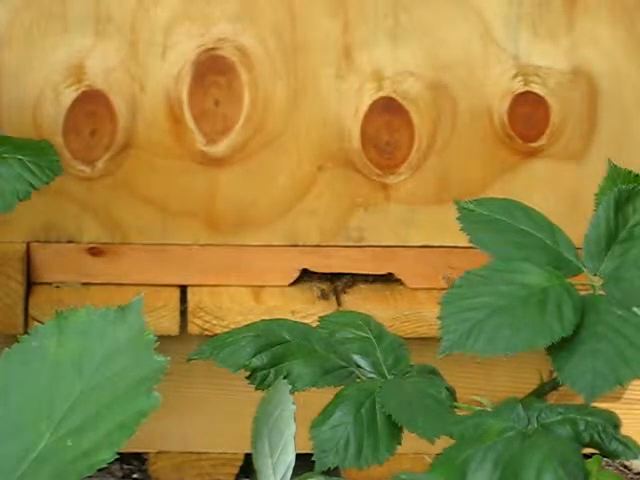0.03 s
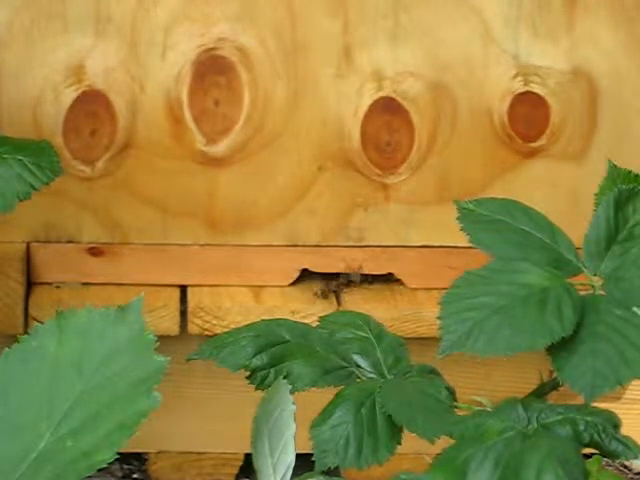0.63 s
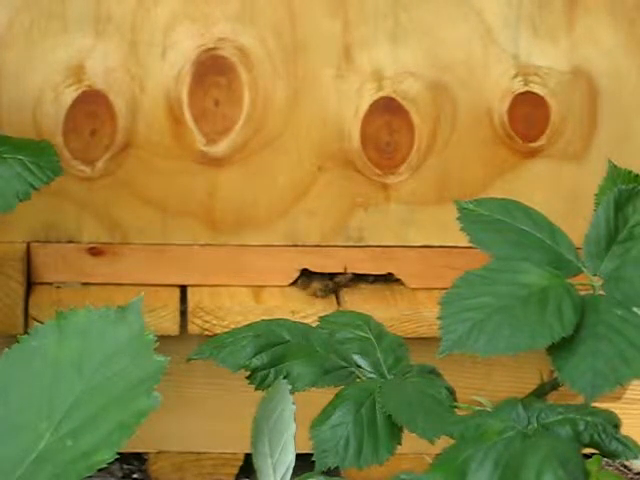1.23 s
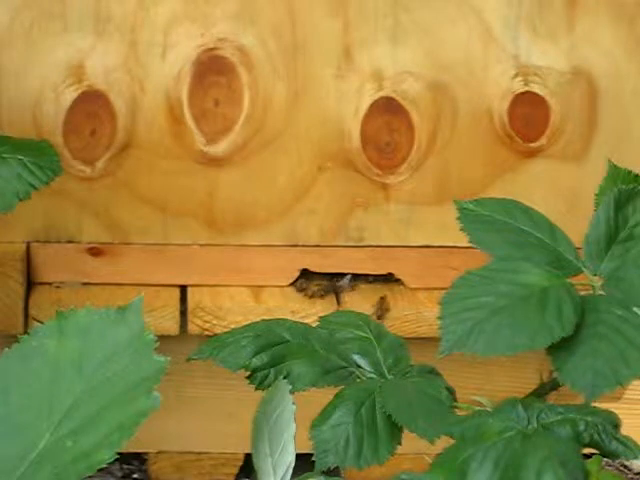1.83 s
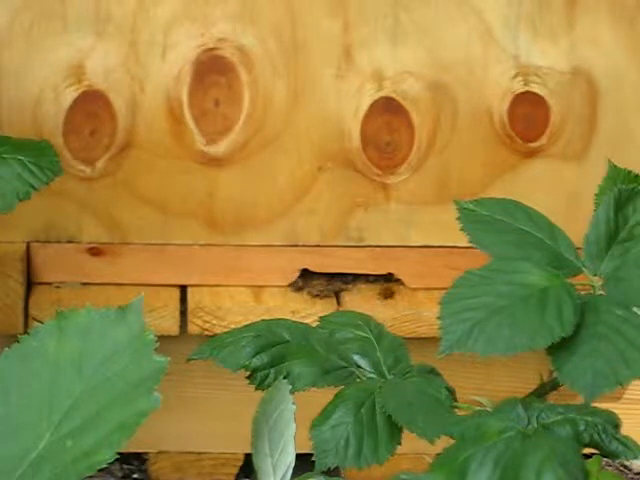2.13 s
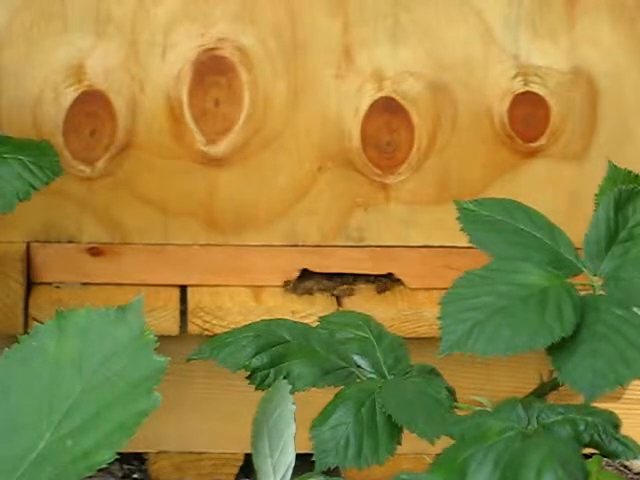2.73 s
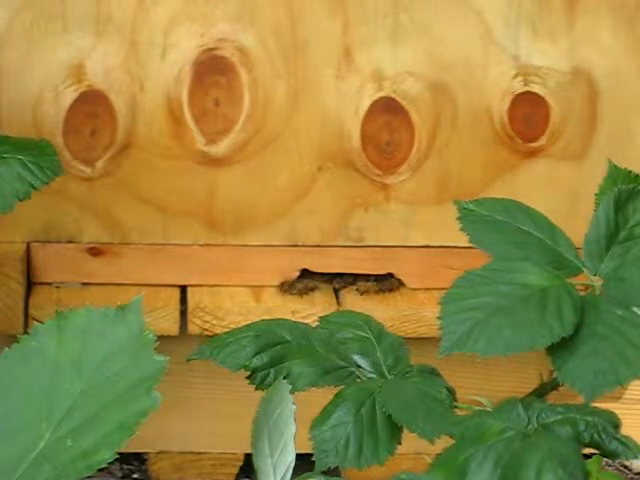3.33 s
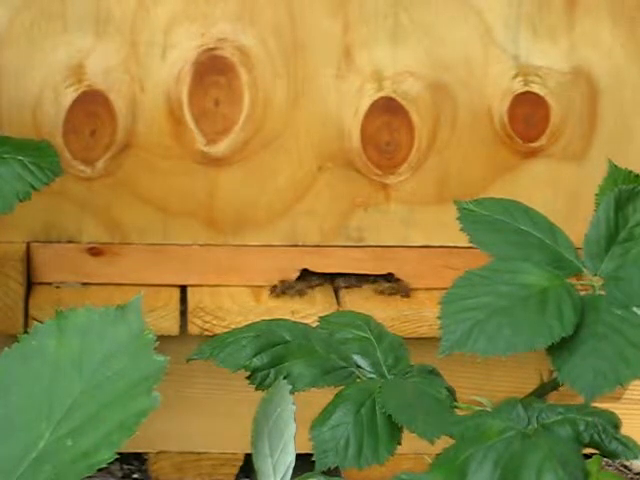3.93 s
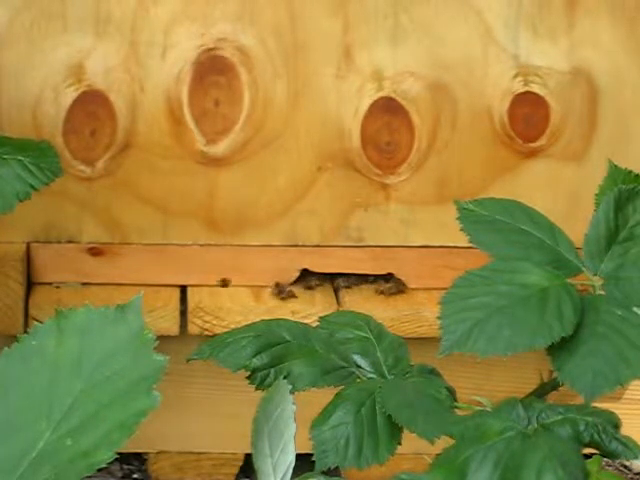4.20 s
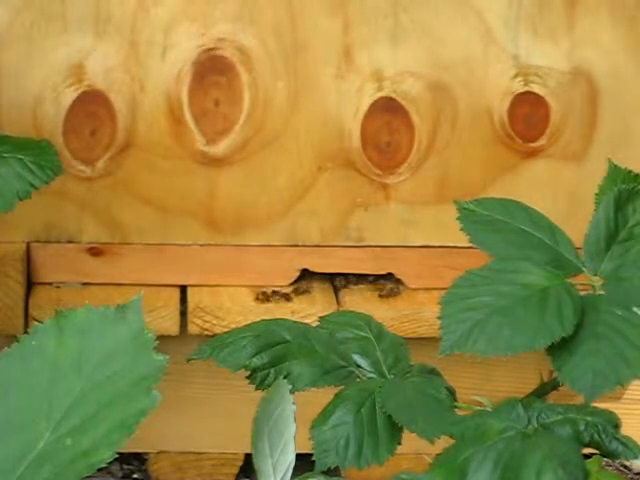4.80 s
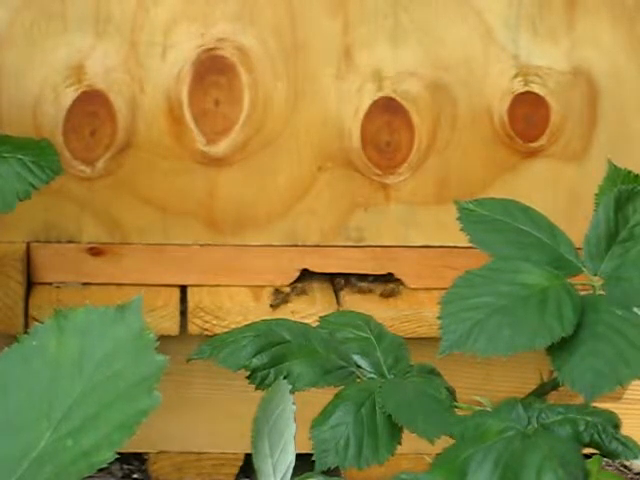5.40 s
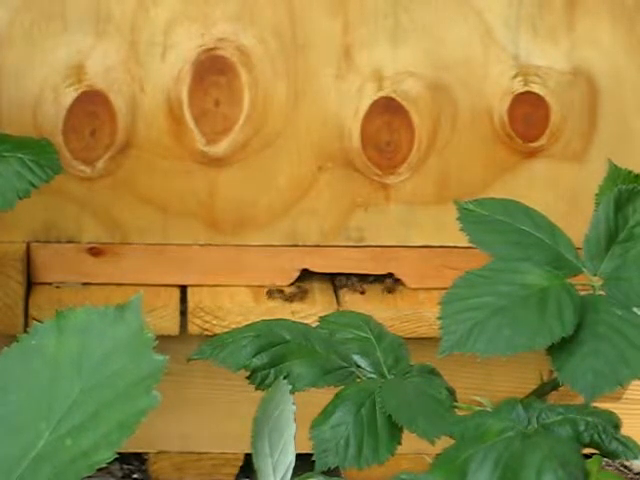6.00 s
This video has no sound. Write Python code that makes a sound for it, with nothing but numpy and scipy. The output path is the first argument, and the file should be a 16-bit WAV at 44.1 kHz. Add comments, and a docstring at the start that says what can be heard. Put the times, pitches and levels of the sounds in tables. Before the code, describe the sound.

In a quiet garden, a single bee buzzes softly by with a light rush of air and leaves, above the faint, steady hum of a hive. A far-off motor drones and a thin electronic whine lies underneath. After a couple of tiny ticks, a sudden cluster of loud, close plastic clicks comes from handling the camera, trailing off into weaker ticks and fingers rubbing near the microphone.

```python
"""Throughout: outdoor air, a low far-off motor drone, the thin whine of a camera's electronics
and the faint wingbeat hum of honeybees at the entrance of a wooden garden hive.
In the first second one bee flies by with a soft, grainy rush of air, and leaves stir.
From 3 s the camera's plastic case ticks; near 3.8 s a hand shifts on it: a quick run of loud clicks.
Small ticks and finger rubs follow."""
import sys
import numpy as np
from scipy import signal
from scipy.fft import rfft, irfft
from scipy.io import wavfile
from scipy.ndimage import uniform_filter1d

SR = 44100
rng = np.random.default_rng(int(sys.argv[2]) if len(sys.argv) > 2 else 0)


def waveform_to_disk(signal):
    """Save audio, clipped to [-1, 1], as 16-bit WAV at the path in sys.argv[1]."""
    frames = np.transpose(np.atleast_2d(signal))
    scaled = np.clip(frames, -1, 1) * 32767
    samples = np.round(scaled).astype(np.int16)
    wavfile.write(sys.argv[1], SR, samples)


N = 266849
TIME_S = np.arange(N) / SR


def amp(db):
    """Decibels to gain."""
    return 10 ** (np.asarray(db) / 20)


def unit(x):
    """Scale to rms 1."""
    return x / np.sqrt(np.mean(x ** 2) + 1e-20)


def burst(sound):
    """Scale to the energy of 10 ms at rms 1."""
    return sound / np.sqrt(np.sum(sound ** 2) / (.01 * SR))


def log_lookup(table, x):
    """Interpolate a table along a logarithmic axis."""
    axis, value = np.transpose(table)
    return np.interp(np.log(x + 1e-3), np.log(axis), value)


def add(mix, start_s, sound):
    """Mix a sound in at start_s."""
    part = mix[round(start_s * SR):][:len(sound)]
    part += sound[:len(part)]


def fade(t, t60_s):
    """Decay of 60 dB in t60_s."""
    return np.exp(-np.log(1000) * t / t60_s)


def swell(mid_s, width_s):
    """Gaussian bump, width_s wide at half height."""
    return .5 ** (((TIME_S - mid_s) / (width_s / 2)) ** 2)


def drift(rate_hz):
    """Slow random wander, rms about 1."""
    hz = np.fft.rfftfreq(2048, 1 / 200)
    slow = irfft(rfft(rng.standard_normal(2048)) * np.exp(-.5 * (hz / rate_hz) ** 2))
    return np.interp(TIME_S, np.arange(len(slow)) / 200, unit(slow))


def noise(colour, patchy_db, edge_hz=15850):
    """Coloured noise, rms 1; level varies in small time-frequency patches."""
    hz = np.fft.rfftfreq(2048, 1 / SR)
    real, imag, patches = rng.standard_normal((3, N // 512 + 5, len(hz)))
    patches = unit(uniform_filter1d(uniform_filter1d(patches, size=6, axis=0), size=30, axis=1))
    spectra = (real + 1j * imag) * amp(log_lookup(colour, hz) + patchy_db * patches) * (hz < edge_hz)
    return unit(signal.istft(spectra.T, nperseg=2048, noverlap=1536)[1][:N])


def min_phase(gain):
    """Minimum-phase impulse response of a gain curve."""
    log_gain = np.log(np.maximum(np.r_[gain, gain[-2:0:-1]], 1e-5))
    return np.fft.ifft(np.exp(np.conj(signal.hilbert(log_gain)))).real


def tone(hz, waver_hz, swell_db):
    """Sine, rms 1, wavering in pitch and level."""
    gain = amp(swell_db * drift(1.4))
    cycles = np.cumsum(hz + waver_hz * drift(7.7)) / SR
    return unit(gain * np.sin(2 * np.pi * cycles))


def air(level_db=-49):
    """Outdoor air and microphone hiss."""
    # noise spectrum: f/Hz, relative density/dB
    colour = [(16, -17), (30, -21), (45, -4), (62, 3), (90, -4.5), (160, -6.5), (230, -5.5), (300, -11),
              (600, -12), (1050, -13.5), (1700, -16.5), (2700, -19), (7000, -26), (12500, -31)]
    return amp(level_db) * noise(colour, patchy_db=.48)


def motor_drone(fading_hz=102, start_db=-55, fade_db_per_s=2):
    """Far-off motor: two lines hold, a third dies away."""
    # held motor lines: f/Hz, level/dB
    lines = [(68, -57.5), (135.5, -61)]
    held = sum(amp(db) * tone(hz, waver_hz=2.53, swell_db=1.5) for hz, db in lines)
    return held + amp(start_db - fade_db_per_s * TIME_S) * tone(fading_hz, waver_hz=2.5, swell_db=1.5)


def electronics_whine():
    """Two thin, high lines from the camera's electronics."""
    # whine lines: f/Hz, level/dB
    lines = [(7558, -74), (15140, -66.5)]
    return sum(amp(db) * tone(hz, waver_hz=12, swell_db=.3) for hz, db in lines)


def wings(beat_hz, overtones_db, flutter_db, harmonics):
    """Wingbeat harmonics, each fluttering in level; overtones_db shifts those above the second."""
    # wingbeat spectrum: harmonic number, level/dB
    spectrum = [(1, -7), (2, 0), (3, -10), (4, -5), (5, -9), (6, -4), (7, -13), (8, -11), (12, -17),
                (24, -28)]
    phase = 2 * np.pi * (np.cumsum(beat_hz) / SR + rng.random())
    out = np.zeros(N)
    for k in range(1, harmonics + 1):
        db = log_lookup(spectrum, k) + overtones_db * (k > 2) + flutter_db * np.tanh(drift(2))
        out += amp(db) * np.cos(k * phase)
    return np.sqrt(2) * out


def colony(level_db=-61, mean_hz=204, wander=.09, swell_db=2.5, bees=6):
    """Farther bees, each on its own wandering pitch and distance."""
    hum = np.zeros(N)
    for _ in range(bees):
        beat_hz = mean_hz * (1 + wander * drift(1.1))
        hum += wings(beat_hz, overtones_db=7, flutter_db=6.5, harmonics=7) * amp(swell_db * drift(3.5))
    return amp(level_db) * unit(hum)


def near_bee(level_db=-59.5, nearest_s=.51, pass_s=.52, jitter=.003):
    """One bee weaves past: louder on faster beats, brighter when facing the microphone."""
    # wingbeat rate: t/s, f/Hz
    beat_track = [(0.0, 220.3), (0.096, 197.7), (0.22, 205.9), (0.308, 182.9), (0.448, 219.0),
                  (0.52, 201.8), (0.612, 224.4), (0.726, 234.5), (0.838, 197.9), (1.03, 232.2),
                  (1.144, 204.8), (1.462, 215.6), (1.498, 205.4), (1.85, 229.7)]
    # turns toward the microphone: mid t/s, width/s, overtone lift/dB
    turns = [(0, .3, 6), (0.408, 0.16, 12.5), (.97, .14, 12), (1.75, .25, 13)]
    cruise_hz, effort_db_per_hz, facing_away_db = 213, .1026, -7
    hidden_s, hidden_db_per_s = 1.83, 30  # slips behind the hive
    beat_hz = np.interp(TIME_S, *np.transpose(beat_track))
    distance = np.hypot(1, (TIME_S - nearest_s) / pass_s)  # 1 at the nearest point
    effort_db = effort_db_per_hz * (beat_hz - cruise_hz)
    shadow_db = hidden_db_per_s * np.maximum(TIME_S - hidden_s, 0)
    overtones_db = facing_away_db + sum(db * swell(mid_s, width_s) for mid_s, width_s, db in turns)
    buzz = wings(beat_hz * (1 + jitter * drift(18)), overtones_db, flutter_db=2, harmonics=16)
    return amp(level_db + effort_db - shadow_db) / distance * buzz


def leaves():
    """Leaves hiss softly in each puff of breeze."""
    # puffs: mid t/s, width/s, level/dB
    puffs = [(.22, 0.96, -57.5), (3.68, .25, -61)]
    # leaf spectrum: f/Hz, relative level/dB
    colour = [(300, -22), (1500, 2), (4000, 1), (8000, -12), (16000, -17)]
    breeze = sum(amp(db) * swell(mid_s, width_s) for mid_s, width_s, db in puffs)
    return breeze * noise(colour, patchy_db=0)


def rush_and_rubs(floor_db=-67, grain_db=1.7):
    """A soft, grainy rush of air as the bee flies by; later, skin drags unevenly over plastic."""
    # swells (first the air rush, then finger strokes): mid t/s, width/s, level/dB
    swells = [(.25, .35, -58.5), (3.662, 0.12, -52), (4.22, 0.33, -58.5), (4.62, .28, -57.5),
              (5.273, 0.21, -56.5), (5.56, .07, -47.5), (5.68, .14, -48.5), (5.948, .16, -54.5)]
    # spectrum of both: f/Hz, relative level/dB
    colour = [(60, -18), (200, -12), (340, 6.5), (480, 0), (720, -8), (900, 7), (1150, 3.5), (1400, -1.5),
              (1650, 1.5), (2700, -2.5), (4000, -15.5), (8000, -24.5), (16000, -25)]
    envelope = amp(floor_db) + sum(amp(db) * swell(mid_s, width_s) for mid_s, width_s, db in swells)
    return envelope * amp(grain_db * drift(31)) * noise(colour, patchy_db=3.2)


def case_ticks(t60_s=.048, size=4096):
    """Tiny bright snaps of the case, each with a short rattle."""
    # dry ticks: t/s, level/dB
    ticks = [(2.9642, -48), (3.299, -55), (4.387, -53.5)]
    # tick spectrum: f/Hz, relative level/dB
    colour = [(700, -30), (2200, -3), (2750, 14), (3400, 2), (7500, -1.5), (12000, -9), (16000, -16)]
    out, t = np.zeros(N), np.arange(size) / SR
    snap = unit(signal.unit_impulse(size))
    response = min_phase(amp(log_lookup(colour, np.fft.rfftfreq(size, 1 / SR))))
    for start_s, db in ticks:
        rattle = unit(rng.standard_normal(size) * fade(t, t60_s))
        add(out, start_s, amp(db) * burst(signal.fftconvolve(snap + rattle, response)[:size]))
    return out


def contact_response(bright_hz, spot_hz, spot_db, size):
    """Impulse response of one contact: band-limited snap, resonance of the spot touched."""
    # snap spectrum: f/Hz, relative level/dB
    colour = [(100, 13), (350, 2), (480, 1), (700, 1.5), (1200, 3.5), (1600, 5), (2300, 3), (3000, 6.5),
              (3500, 3.5), (4600, 3), (5200, 1.5), (7200, 1.5), (9000, -1), (16000, -9)]
    hz = np.fft.rfftfreq(size, 1 / SR) + 1
    resonance_db = spot_db / (1 + (np.log(hz / spot_hz) / .1) ** 2)
    low_cut_hz = 305 * (bright_hz / 1000) ** .27  # sharper contacts carry less bass
    treble_loss = 1 + (hz / bright_hz) ** 5
    bass_loss = (1 + (low_cut_hz / hz) ** 4) * (1 + (200 / hz) ** 8)
    gain = amp(log_lookup(colour, hz) + resonance_db) / np.sqrt(treble_loss * bass_loss)
    return min_phase(gain)[:size // 4]


def case_clicks(firm_db=-18.5, build_s=.00067, detune=.0076, size=16384):
    """The hand shifts: each snap rattles the case and rings its modes and its hollow."""
    # contacts: t/s, level/dB, treble corner/Hz, rattle re snap/dB, spot resonance/Hz, its lift/dB
    clicks = [(3.789, -23.5, 523, 15, 340, 0), (3.7942, -19.5, 9900, 4, 995, 10),
              (3.816, -23, 780, 5, 300, 2), (3.825, -14, 12700, -4.5, 342, 8),
              (3.8674, -30, 5440, 5, 1310, 0), (3.8757, -11.5, 9000, -3.5, 4700, 1),
              (3.9117, -20.5, 4700, 1.5, 1900, 6), (3.9154, -24.5, 6000, -8, 4500, 13),
              (3.932, -34.5, 3000, 8, 403, 8), (4.0348, -18, 4180, -5, 2250, 7),
              (4.041, -38.5, 500, 15, 413, 3), (4.08, -41, 686, -5, 400, 7), (4.94, -38, 2400, 13, 860, 17),
              (4.9605, -38, 1240, 2, 1130, 1), (4.9702, -41.5, 2380, -3, 2780, 9.5),
              (5.1281, -35, 2160, -4.5, 2470, 9), (5.1315, -41, 2190, -2, 2630, 4),
              (5.179, -48, 1800, -5, 1150, 9), (5.337, -48, 1700, 12, 1190, 8),
              (5.641, -47, 1700, -1, 335, 11), (5.984, -49.5, 1900, 5, 1800, 15),
              (6.023, -45, 1600, 4, 627, 6)]
    # case modes: f/Hz, level/dB, t60/s
    modes = [(355, -11, .04), (668, -12, .05), (915, -15, .04), (1085, -14, .05), (1240, -14, .05),
             (1860, -16, .07), (2250, -16, .05), (2530, -18, .05), (2910, -16, .06), (4100, -16, .04),
             (4720, -14, .04)]
    firm_t60_s, doubling_db = .067, 28  # harder clicks rattle longer
    hollow_hz, hollow_t60_s = 598, .22
    echo_db, echo_t60_s = -21, .3  # scatter from hive wall and leaves
    out, t = np.zeros(N), np.arange(size) / SR
    snap = unit(signal.unit_impulse(size))
    hollow = np.sqrt(2) * fade(t, hollow_t60_s) * np.sin(2 * np.pi * hollow_hz * t)
    for start_s, db, bright_hz, rattle_db, spot_hz, spot_db in clicks:
        force_db = db - firm_db
        rattle_t60_s = firm_t60_s * 2 ** (force_db / doubling_db)
        hollow_db = -20.5 - .25 * force_db  # the hollow's share shrinks with force
        early, late = rng.standard_normal((2, size)) * (1 - np.exp(-t / build_s))
        grip = 1 + detune * rng.standard_normal()  # fingers detune the case
        ring = sum(amp(mode_db) * unit(fade(t, t60_s) * np.cos(2 * np.pi * (grip * hz * t + rng.random())))
                   for hz, mode_db, t60_s in modes)
        rattle = amp(rattle_db) * (unit(early * fade(t, rattle_t60_s)) + ring)
        echo = amp(echo_db) * unit(late * fade(t, echo_t60_s))
        response = contact_response(bright_hz, spot_hz, spot_db, size)
        click = signal.fftconvolve(snap + rattle + echo, response)[:size]
        add(out, start_s, amp(db) * (burst(click) + amp(hollow_db) * hollow))
    return out


def scene():
    """Mono mix: background, garden, then the close sounds."""
    background = air() + motor_drone() + electronics_whine()
    garden = near_bee() + colony() + leaves()
    close = case_clicks() + case_ticks() + rush_and_rubs()
    return (background + garden + close)[None]


def record(dry, ceiling=.72, edge_hz=16300):
    """Input stage rounds off the hardest snaps; then a low-pass."""
    rounded = dry / (1 + (dry / ceiling) ** 6) ** (1 / 6)
    low_pass = signal.firwin(511, edge_hz, window=("kaiser", 9), fs=SR)
    return signal.oaconvolve(rounded, low_pass[None], "same")


dry = scene()
out = record(dry)
waveform_to_disk(out)
```